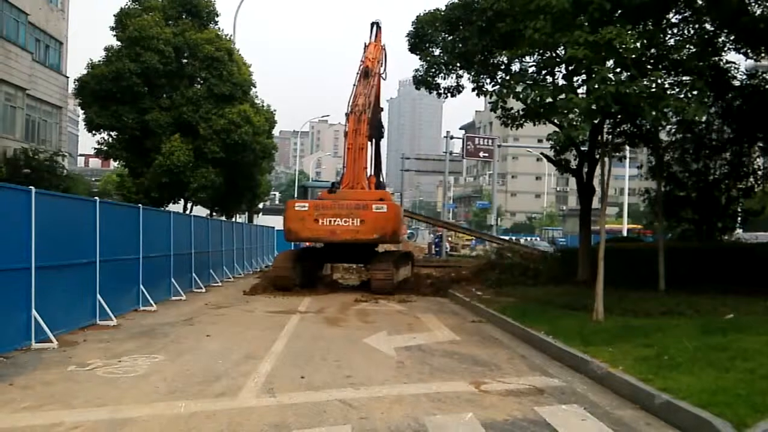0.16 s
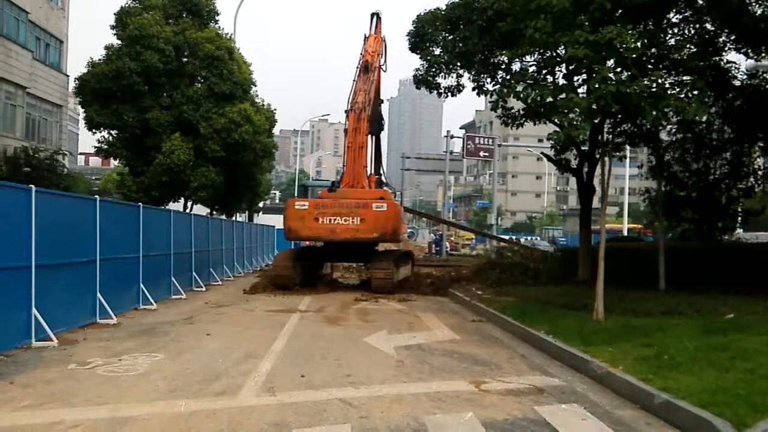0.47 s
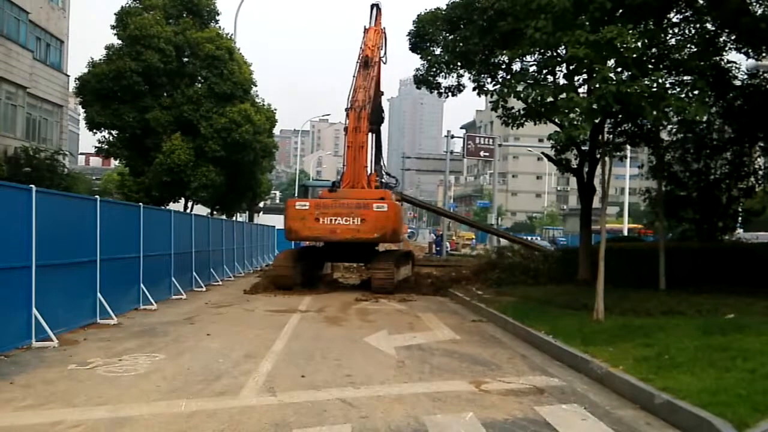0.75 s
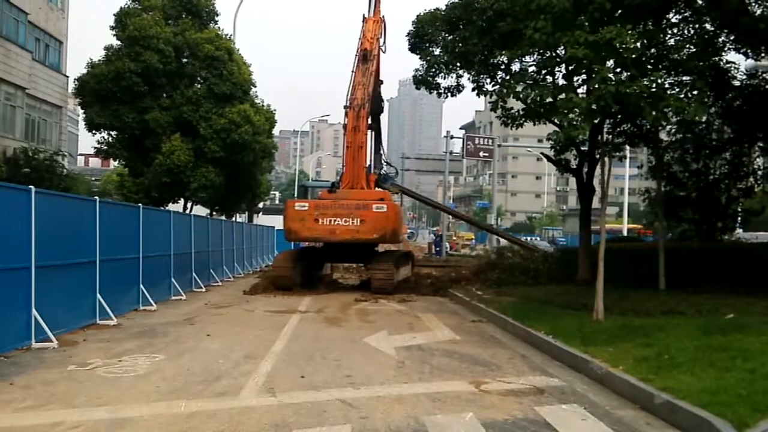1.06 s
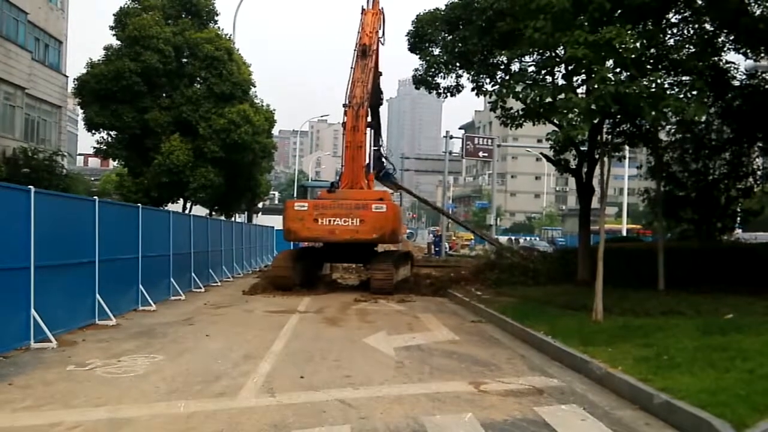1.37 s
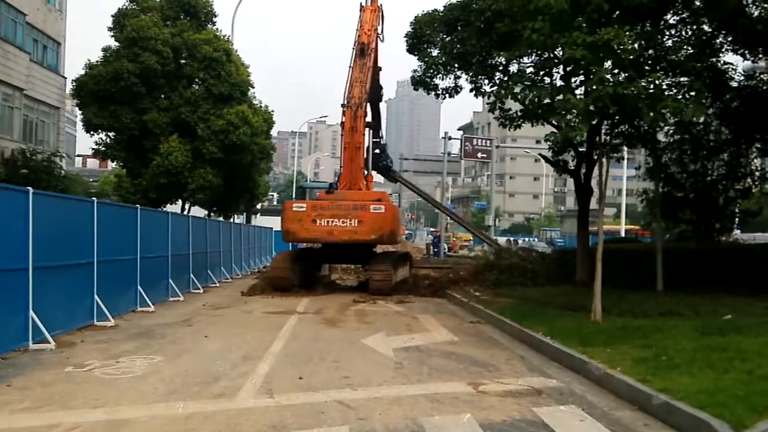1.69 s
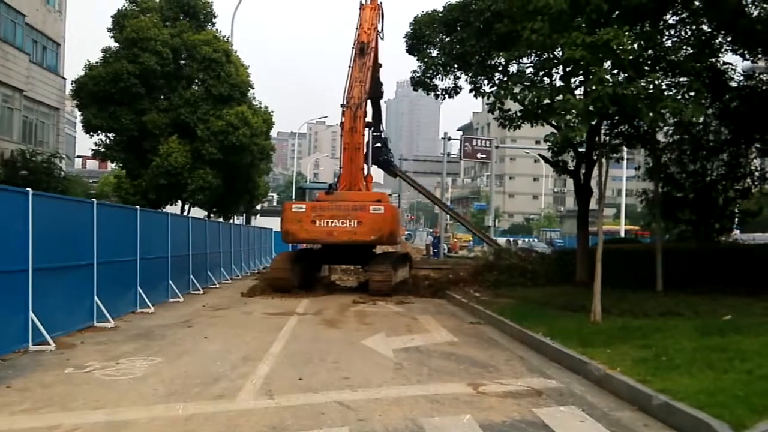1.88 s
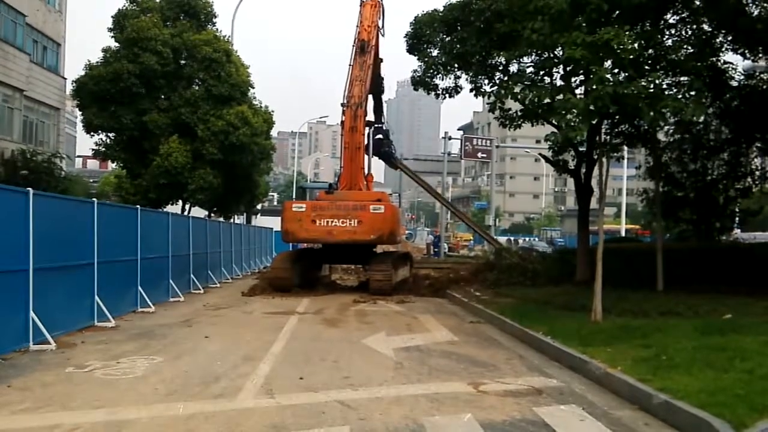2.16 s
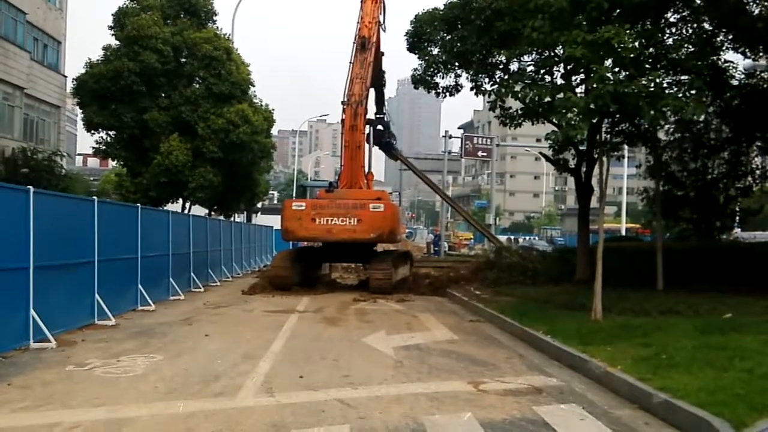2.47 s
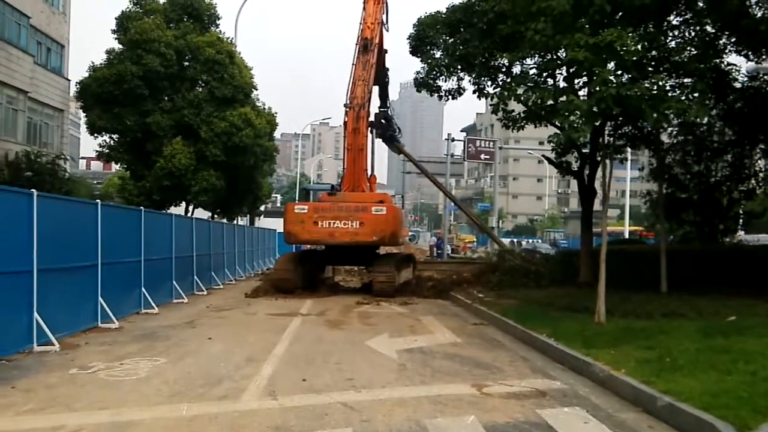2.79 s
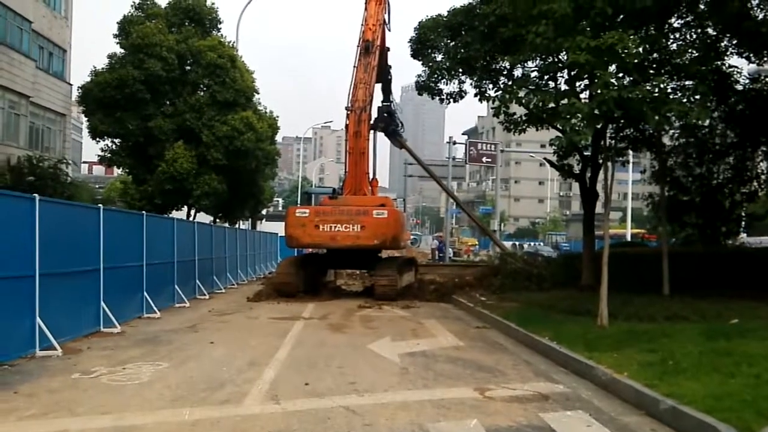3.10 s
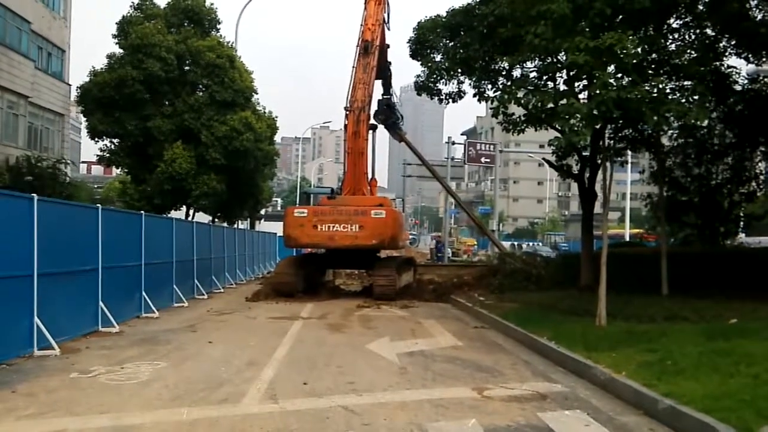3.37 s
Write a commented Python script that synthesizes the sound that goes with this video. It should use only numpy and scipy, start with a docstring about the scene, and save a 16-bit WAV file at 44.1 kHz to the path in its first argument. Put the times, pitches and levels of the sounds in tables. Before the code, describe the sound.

Steady low excavator drone with hydraulic hum and hiss, drifting slightly in pitch; a brief ringing metal scrape near the start, a heavy thump around two seconds, heard outdoors by a phone at a distance.

```python
"""Excavator engine and scraped pole

An excavator's diesel engine drones in a street, some 20 m from a phone; its speed drifts with the hydraulic load.
Exhaust and pump are sines locked to the crank angle; block and engine hiss are filtered patchy noise.
The bucket scrapes a steel pole (noise through resonances), which later thuds on the soil (sagging sines)
and clanks (short resonant noise); small pings are decaying sines. The phone's gain control ducks under
loud moments."""
import sys
import numpy as np
from scipy import signal
from scipy.fft import rfft, irfft, next_fast_len
from scipy.io import wavfile
from scipy.ndimage import uniform_filter1d, map_coordinates

SR = 44100
rng = np.random.default_rng(int(sys.argv[2]) if len(sys.argv) > 2 else 0)


def level_to_linear(level):
    """Convert decibel levels to linear amplitude factors, elementwise."""
    exponent = np.asarray(level, float) / 20
    return 10 ** exponent


def bounce(signal):
    """Save signal as a 16-bit WAV file at the path given by the first command-line argument."""
    frames = np.transpose(np.atleast_2d(signal))
    limited = np.clip(frames, -1, 1)
    pcm = np.round(limited * 32767).astype(np.int16)
    wavfile.write(sys.argv[1], SR, pcm)


N = 156114
T = np.arange(N) / SR


def unit(x):
    """Scale to rms 1."""
    return x / np.sqrt(np.mean(x ** 2) + 1e-20)


def along(points, hz):
    """Interpolate (Hz, value) points on a log frequency axis."""
    f, v = np.transpose(points)
    return np.interp(np.log(hz + 1), np.log(f + 1), v)


def over_time(points):
    """Interpolate (s, value) points over the scene."""
    return np.interp(T, *np.transpose(points))


def wobble(knots_per_s):
    """Smooth random curve through normal random knots."""
    knots = rng.standard_normal(int(N * 40 / SR) + 4)
    return map_coordinates(knots, [T * min(knots_per_s, 40)])


def filtered(x, response):
    """Apply a complex response of frequency to x."""
    m = next_fast_len(N + SR // 2)
    return irfft(rfft(x, m) * response(np.fft.rfftfreq(m, 1 / SR)), m)[:N]


def ringing(x, peaks):
    """Pass x through parallel resonances (Hz, width Hz, dB) of alternating sign."""
    def response(f):
        total = 0
        for k, (center, width, db) in enumerate(peaks):
            damping = 1j * f * width
            total = total + (-1) ** k * level_to_linear(db) * damping / (center * center - f * f + damping)
        return total
    return filtered(x, response)


def patchy(patchy_db):
    """White noise with random gain in time-frequency patches, patchy_db rms."""
    z = signal.stft(rng.standard_normal(N + 512), nperseg=512)[2]
    field = uniform_filter1d(rng.standard_normal(z.shape), 4, 0)
    field = uniform_filter1d(field, 10, 1)
    return signal.istft(z * level_to_linear(patchy_db * unit(field)), nperseg=512)[1][:N]


# Spectrum of the engine hiss. Each row: frequency in Hz, relative density in dB per Hz before the ripple.
HISS_SPECTRUM = [(1530, -26), (2600, -8), (3330, -2), (3620, -4.5), (3810, -1), (6640, -1.5), (7560, -9.5),
                 (8040, -15), (8700, -15.5), (9950, -34.5), (12900, -55), (21900, -120)]
# Slow level changes of the hiss. Each row: time in seconds, level change in dB.
HISS_CHANGE = [(.1, 0), (.5, -0.5), (1.3, 1.5), (1.6, -.6), (2.05, -2.6), (2.3, -0.3), (2.9, -.6),
               (3.54, 0.7)]


def engine_hiss():
    """Broadband engine hiss; an evenly spaced ripple is laid over its spectrum."""
    level_db, ripple_hz, ripple_db = -31, 493.7, 3

    def response(f):
        wide = np.cos(2 * np.pi * f / ripple_hz - 1.1)
        narrow = np.cos(10 * np.pi * f / ripple_hz - 5.5)  # a fifth of the spacing
        return level_to_linear(along(HISS_SPECTRUM, f) + ripple_db * (wide + narrow))

    noise = unit(filtered(patchy(patchy_db=0.78), response))
    return level_to_linear(level_db + over_time(HISS_CHANGE) + .7 * wobble(17)) * noise


# Hydraulic pump hum. Each row: time in seconds, level in dB rms before wavering.
PUMP_LEVEL = [(.1, -32), (.6, -35.5), (1.2, -44), (1.9, -30.5), (2.3, -32.5), (2.5, -31), (2.9, -27.5),
              (3.2, -27.5), (3.54, -27.5)]


def pump(angle):
    """Pump hum locked to the crank: one sine at a fixed multiple of crank speed."""
    order = 12
    level = level_to_linear(over_time(PUMP_LEVEL) + 2.1 * wobble(5.6))
    return np.sqrt(2) * level * np.sin(order * angle + 0.1 * wobble(10))


# Spectrum of engine block and hood panels. Each row: frequency in Hz, relative density in dB per Hz.
BLOCK_SPECTRUM = [(20, -120), (28, -10.5), (40, -6.5), (50, 0), (80, 1.5), (115, -1.5), (160, -3),
                  (330, -4), (390, -1), (415, -9.5), (432, -15), (460, -10), (500, -9.5), (570, -14),
                  (680, -8), (738, -5.5), (765, -5), (793, -5), (830, -7), (880, -4), (935, -18), (985, -3),
                  (1010, -10), (1040, -24), (1100, -17), (1160, -19.5), (1235, -11), (1285, -18.5),
                  (1370, -10), (1420, -18.5), (1480, -11), (1550, -19.5), (1700, -13.5), (1930, -19.5),
                  (2080, -18), (2210, -10.5), (2270, -19.5), (2340, -7.5), (2395, -19.5), (2430, -19.5),
                  (2700, -20.5), (3300, -39.5), (4000, -120)]


def block(angle, firing_db):
    """Block and panels radiate noise that beats with the firings; it fades as the machine swings."""
    level_db, fade_db_per_s = -17.5, -0.69
    beat_depth, swing_share = 0.087, 0.29  # swing_share: part of the firing level's swings in dB
    swing_db = swing_share * (firing_db - firing_db.mean()) + .5 * wobble(3.75)
    beat = 1 + beat_depth * np.cos(2 * angle + 0.86)
    noise = unit(filtered(beat * patchy(patchy_db=0.5), lambda f: level_to_linear(along(BLOCK_SPECTRUM, f))))
    return level_to_linear(level_db + swing_db + fade_db_per_s * T) * noise


# Exhaust orders besides the firing order; echoes off the house fronts favour some speeds.
# Each row: multiple of crank speed, level in dB rms when slow, at idle, when fast, wavering in dB.
ORDERS = [(1, -42, -42, -45, 3), (3, -21, -23.5, -26, 1.2), (4, -30, -26.5, -18.5, 1.5),
          (5, -32, -37, -37, 2), (6, -35, -24.5, -24, 1.2), (7, -41, -38, -38, 2), (8, -27, -34, -33, 1.5),
          (9, -37, -40, -37, 2), (10, -35, -43, -45, 2), (11, -34, -38, -35, 2), (16, -46, -46, -43, 2)]
# Crank speeds in turns per second: slow, idle, fast.
SPEEDS_HZ = [30.9, 31.7, 32.4]


def exhaust(angle, crank_hz, firing_db):
    """Exhaust pulses: cosines at multiples of crank speed, strongest at two firings a turn."""
    skew_rad_per_hz = 1.3  # the pulse leans forward when slow, back when fast
    skew = skew_rad_per_hz * (SPEEDS_HZ[1] - crank_hz)
    firing = level_to_linear(firing_db + 0.33 + 0.65 * wobble(7.2))
    out = -np.sqrt(2) * firing * np.cos(2 * angle)
    for k, *levels_db, waver_db in ORDERS:
        level = level_to_linear(np.interp(crank_hz, SPEEDS_HZ, levels_db) + waver_db * wobble(4.85))
        out -= np.sqrt(2) * level * np.cos(k * angle + skew)
    return out


# Each row: time in seconds, crank speed in turns per second, firing order level in dB before trim.
ENGINE = [(.12, 31.1, -15), (.32, 31.58, -18.5), (.52, 32.42, -18.2), (.72, 31.91, -15.7),
          (.92, 30.7, -15.9), (1.08, 30.79, -13), (1.31, 31.46, -15.2), (1.51, 32.16, -16.9),
          (1.71, 32.43, -15.6), (1.93, 31.58, -19.5), (2.11, 31.79, -17), (2.31, 31.96, -16.3),
          (2.51, 31.93, -17.7), (2.75, 32.04, -19), (2.9, 31.34, -17.6), (3.1, 31, -14.4),
          (3.3, 30.9, -14.2), (3.5, 31.1, -16.5)]


def engine():
    """One crank angle, integrated from the drifting speed, drives exhaust, pump and block; hiss is added."""
    s, speed_hz, level_db = np.transpose(ENGINE)
    crank_hz = uniform_filter1d(np.interp(T, s, speed_hz), size=4000)
    firing_db = uniform_filter1d(np.interp(T, s, level_db), size=2600)
    angle = 2 * np.pi * np.cumsum(crank_hz) / SR + 0.0087 * wobble(9)
    return exhaust(angle, crank_hz, firing_db) + pump(angle) + block(angle, firing_db) + engine_hiss()


# Each row: start in seconds, level in dB before the onset, frequency in Hz.
PINGS = [(.595, -22.5, 5450), (0.38, -23, 780), (.255, -27, 4120)]


def pings():
    """Small pings: exponentially decaying sines with a soft onset."""
    t60_s, onset_s = .1, 0.0019
    out = np.zeros(N)
    for s, db, hz in PINGS:
        t = np.maximum(T - s, 0)
        out += level_to_linear(db - 60 * t / t60_s) * (1 - np.exp(-t / onset_s)) * np.sin(2 * np.pi * hz * t)
    return out


# Each row: start in seconds, level in dB rms before fading, fading time constant in seconds.
CLANKS = [(1.835, -20, .045), (1.92, -20, .035), (1.965, -11.5, .008), (2.33, -23, .06), (1.08, -24, .03)]
# Clank resonances. Each row: frequency in Hz, width in Hz, gain in dB.
CLANK_MODES = [(740, 50, -15), (880, 40, 0), (990, 40, -10), (1360, 50, -16), (1700, 200, -20)]


def clanks():
    """Short clanks: resonant noise under quick rises and exponential fades."""
    rise_s, hold_s = 0.013, .011
    shape = np.zeros(N)
    for s, db, fade_s in CLANKS:
        fade = np.exp(-np.maximum(T - s - hold_s, 0) / fade_s)
        shape += level_to_linear(db) * fade * np.clip((T - s) / rise_s, 0, 1)
    return shape * unit(ringing(rng.standard_normal(N), CLANK_MODES))


# Each row: start in seconds, starting level in dB peak, starting frequency in Hz.
THUDS = [(1.855, -.5, 180), (1.916, -8, 235), (2.07, -13, 140)]


def thuds():
    """The pole hits soil: dull decaying sines whose pitch sags."""
    t60_s, sag_share, sag_s = .36, .33, .011
    out = np.zeros(N)
    for s, db, hz in THUDS:
        t = np.maximum(T - s, 0)
        turns = hz * ((1 - sag_share) * t + sag_share * sag_s * (1 - np.exp(-t / sag_s)))
        out -= level_to_linear(db - 60 * t / t60_s) * np.sin(2 * np.pi * turns)
    return out


# Drag of the bucket. Each row: time in seconds, level in dB before trim.
DRAG = [(.1, -30), (.16, -26), (.21, -21), (.25, -15), (.285, -17.5), (.31, -12.5), (.35, -16.5),
        (.385, -15.5), (.42, -16), (.455, -21), (.55, -24), (.58, -21), (.62, -27), (.75, -31), (1, -40),
        (1.2, -55)]
# Pole under friction. Each row: frequency in Hz, width in Hz, gain in dB.
POLE_MODES = [(486, 33, -6), (626, 38, -5.5), (789, 42, -1), (946, 25, -5), (1086, 42, -10.5),
              (1326, 24.6, -8), (1454, 29, -4.5), (1595, 47, -12.5), (1720, 83, -13.5), (2344, 390, -21.5)]


def scrape():
    """Uneven slips of steel on steel excite the pole's resonances."""
    s, db = np.transpose(DRAG)
    trim_db = .5  # overall scrape level trim
    slips = rng.standard_normal(N) * level_to_linear(1.5 * wobble(35))
    return level_to_linear(np.interp(T, s, db, right=-99) + trim_db) * unit(ringing(slips, POLE_MODES))


def scene():
    """Everything reaches one microphone."""
    return (engine() + pings() + clanks() + thuds() + scrape())[None]


def gain_control(x):
    """Duck by the held excess of sensed power over a knee; mostly the low mids are sensed."""
    knee_db, squeeze = -14.5, .9  # squeeze: dB of ducking per dB of excess
    attack_s, release_s = .008, .1  # release: the held excess falls 10 dB
    sense_low_hz, sense_high_hz = 90, 600
    sensed = filtered(x, lambda f: f ** 2 / (f ** 2 + sense_low_hz ** 2) / np.hypot(1, f / sense_high_hz))
    rate = 1 / (attack_s * SR)
    power = signal.lfilter([rate], [1, rate - 1], sensed ** 2)
    over_db = np.maximum(10 * np.log10(power + 1e-12) - knee_db, 0)
    fall_db = T * 10 / release_s
    held_db = np.maximum.accumulate(over_db + fall_db) - fall_db
    return x * level_to_linear(-squeeze * uniform_filter1d(held_db, size=200))


def cut_and_gap(x):
    """Zero-phase bass cut and a narrow gap near 8 kHz."""
    low_cut_hz, gap_hz, gap_width_hz, gap_db = 15.3, 8050, 160, -54

    def response(f):
        gap = level_to_linear(gap_db * np.exp(-((f - gap_hz) / gap_width_hz) ** 2))
        return gap * f ** 2 / (f ** 2 + low_cut_hz ** 2)

    return filtered(x, response)


def roll_off(x):
    """The treble ends steeply here."""
    return signal.sosfilt(signal.butter(12, 10100, fs=SR, output="sos"), x)


def record(dry):
    """Gain control, bass cut and gap, soft clipping, fade-in."""
    ceiling, start_s, fade_s = 1, 0.093, 0.044
    x = cut_and_gap(gain_control(dry[0]))
    x = x / (1 + np.abs(x / ceiling) ** 4) ** (1 / 4)
    x = x * np.clip((T - start_s) / fade_s, .002, 1) ** 1.28
    return roll_off(x[None])


dry = scene()
out = record(dry)
bounce(out)
```